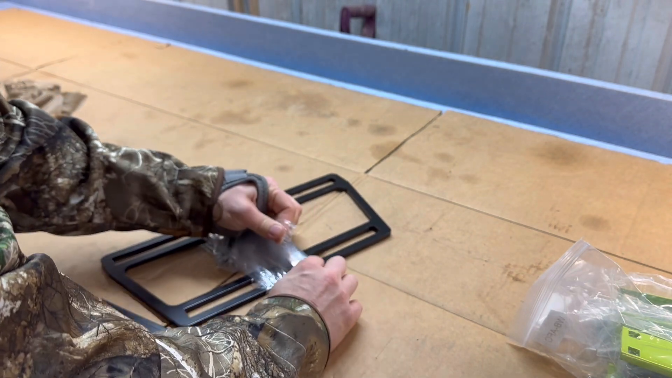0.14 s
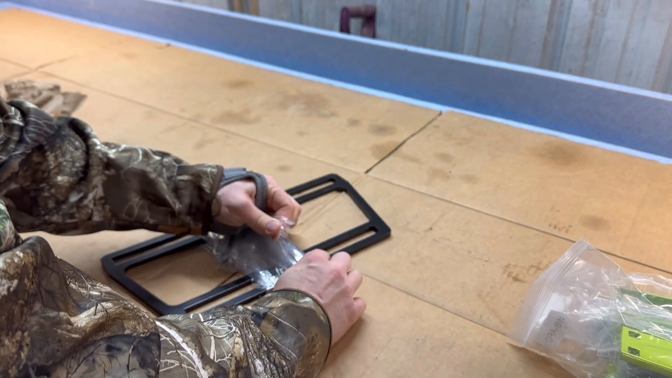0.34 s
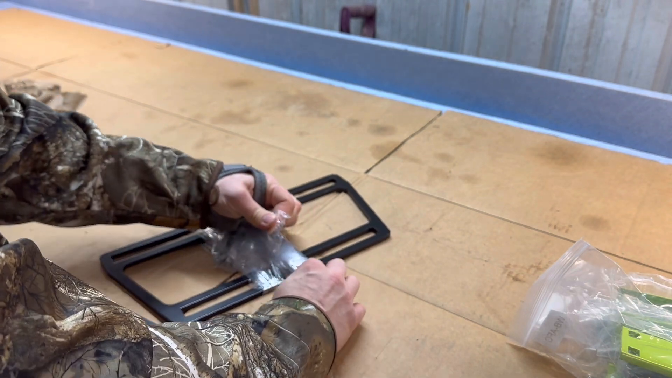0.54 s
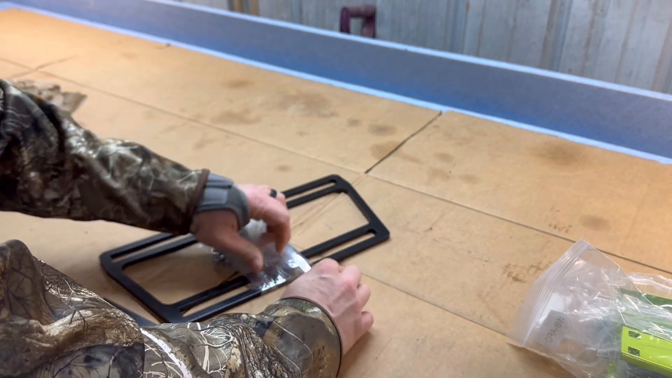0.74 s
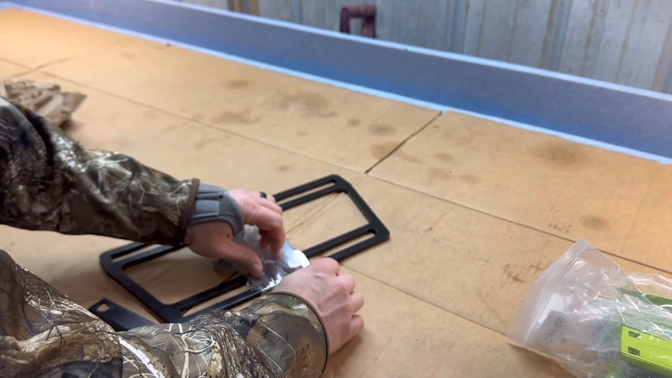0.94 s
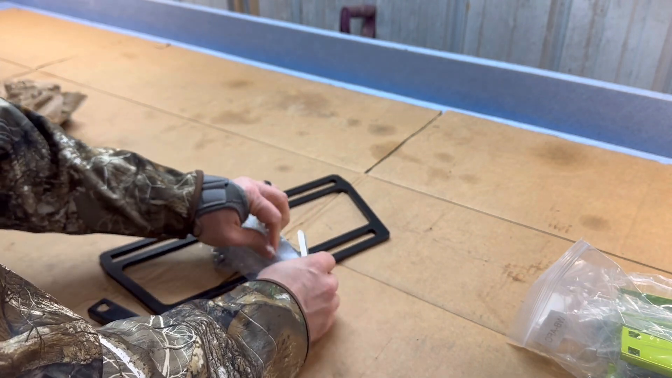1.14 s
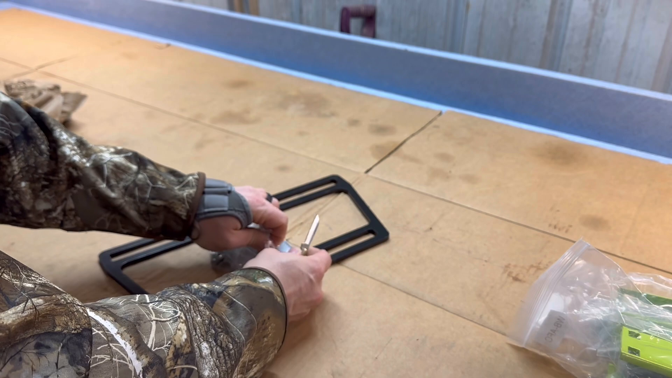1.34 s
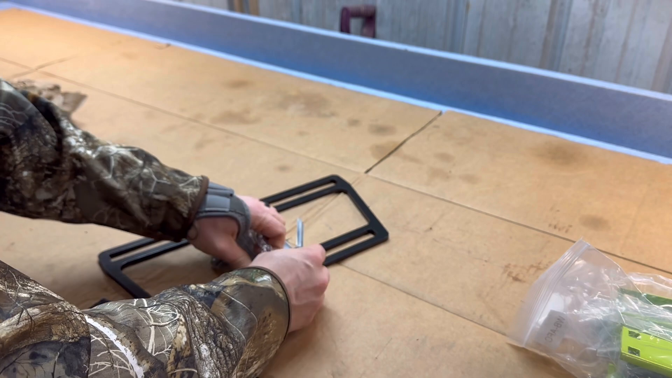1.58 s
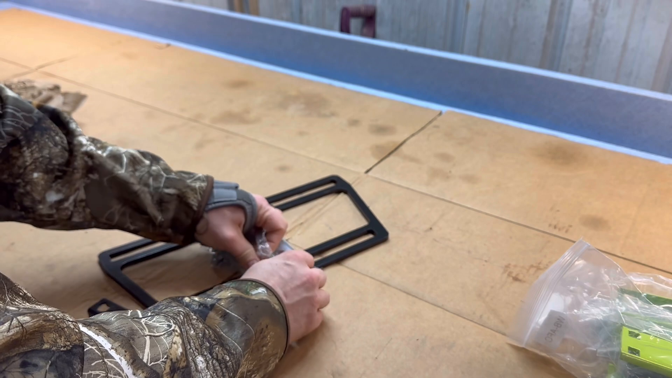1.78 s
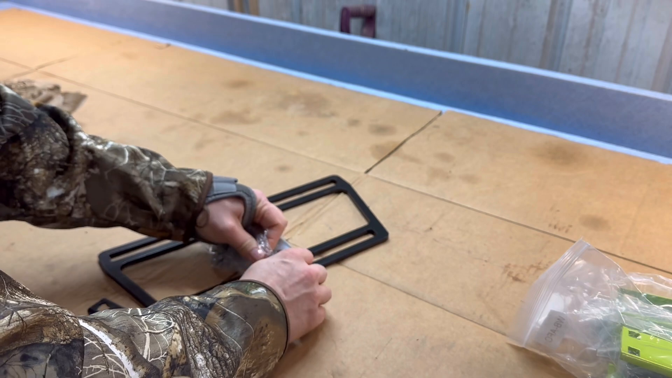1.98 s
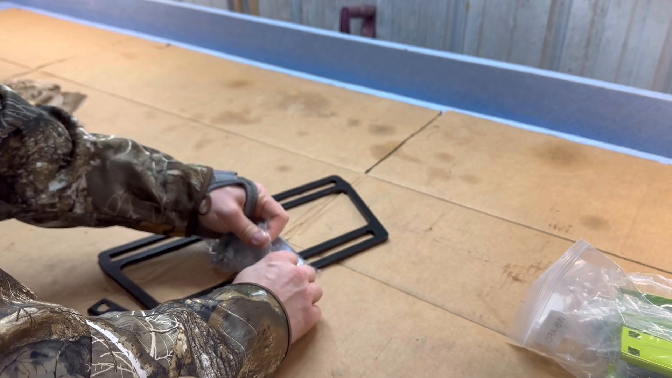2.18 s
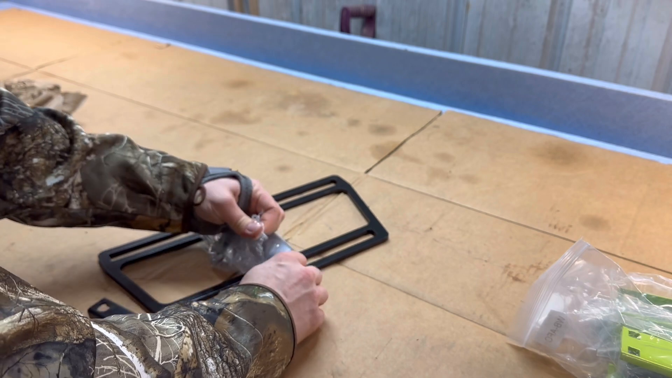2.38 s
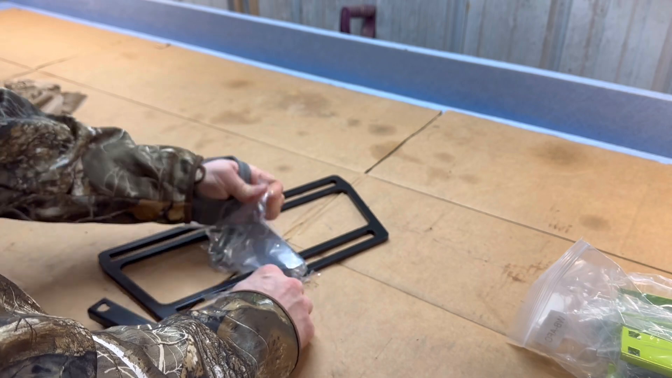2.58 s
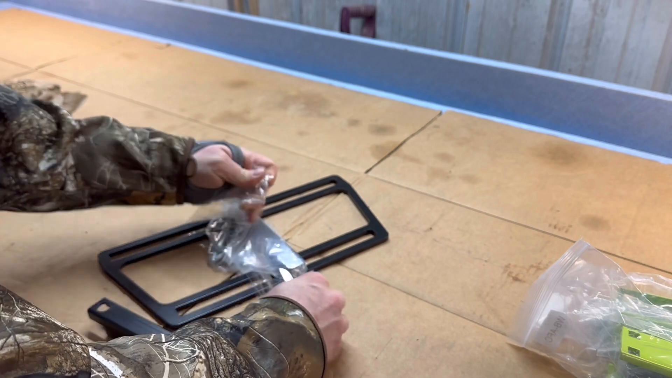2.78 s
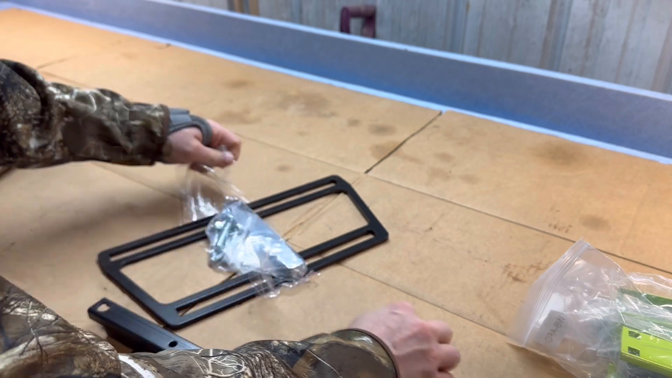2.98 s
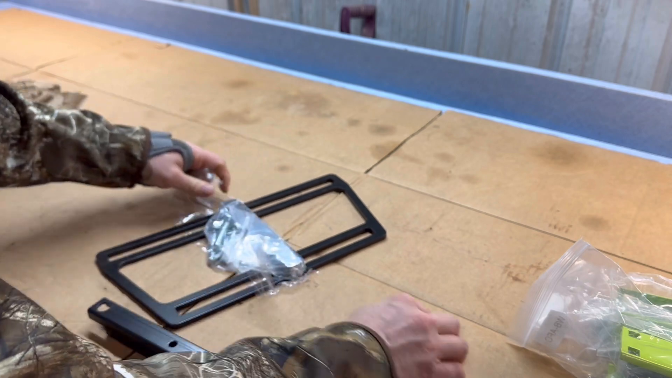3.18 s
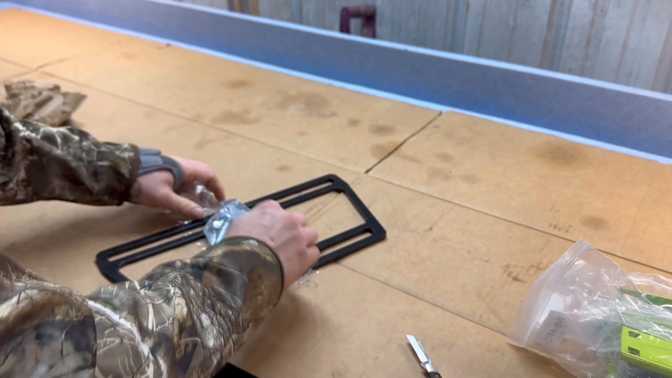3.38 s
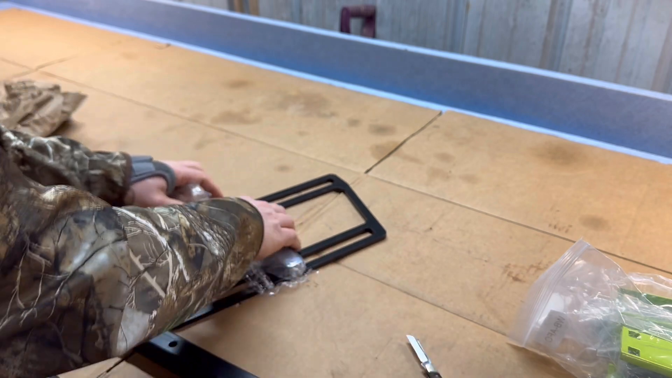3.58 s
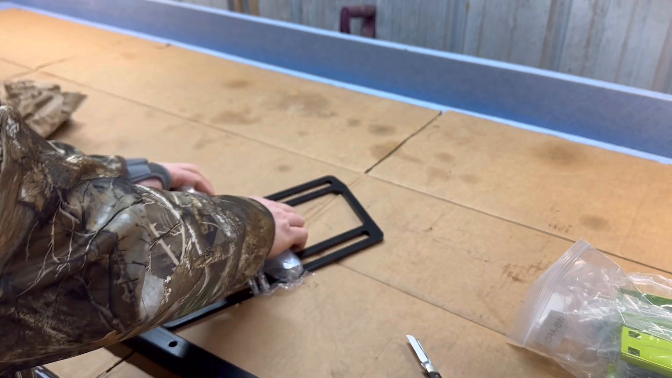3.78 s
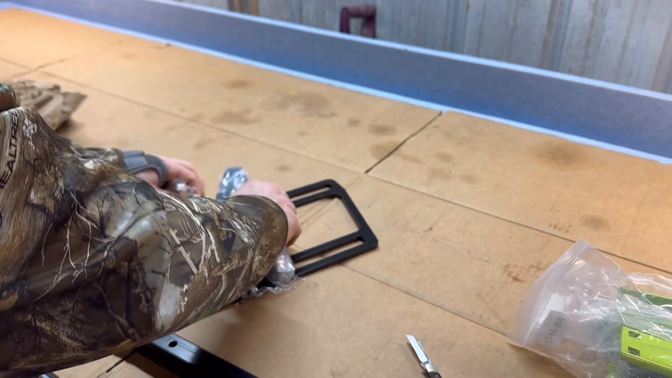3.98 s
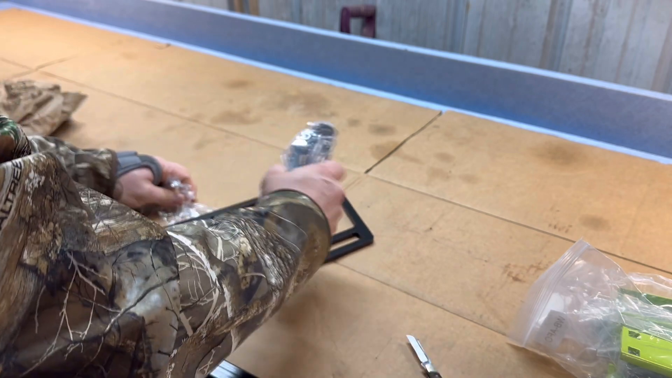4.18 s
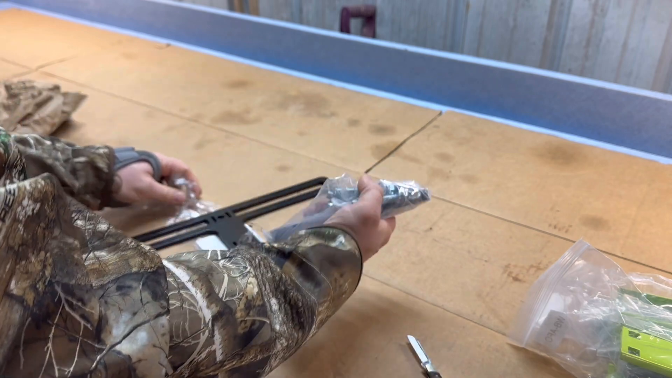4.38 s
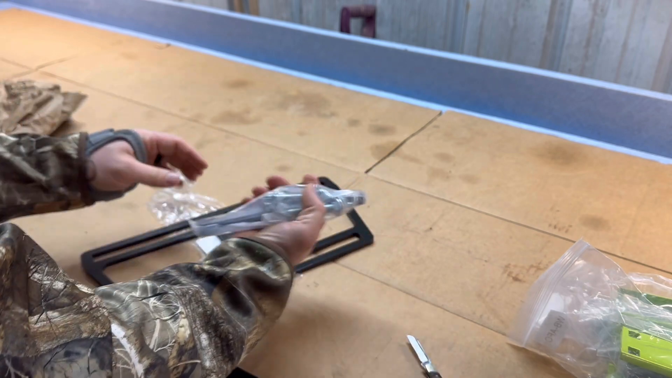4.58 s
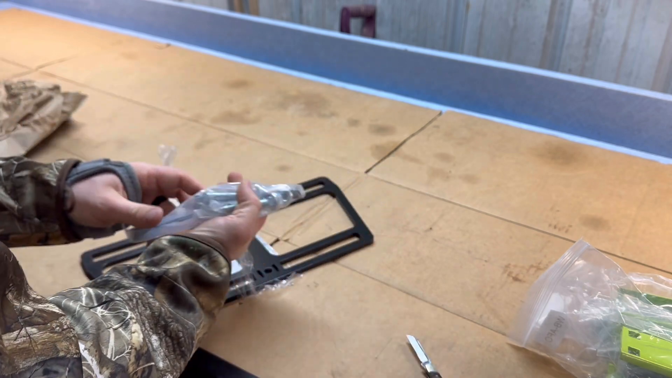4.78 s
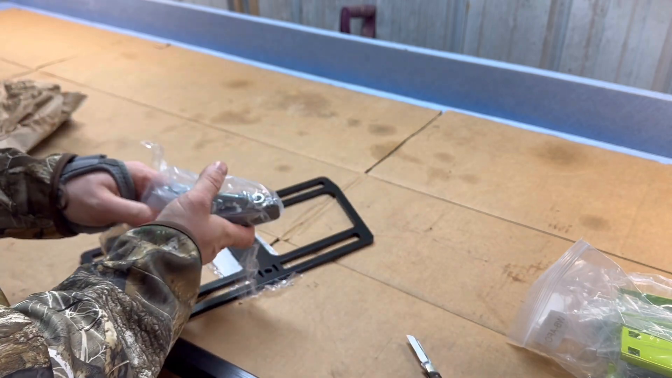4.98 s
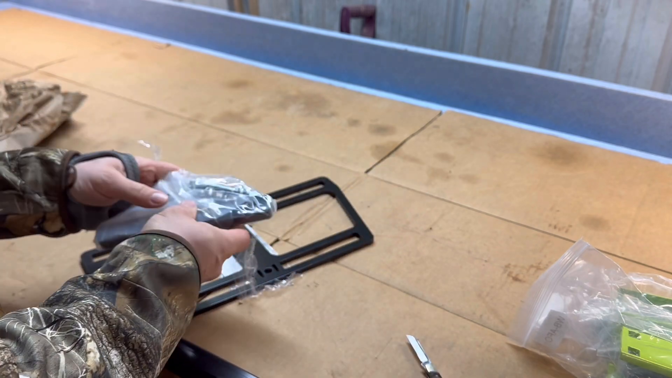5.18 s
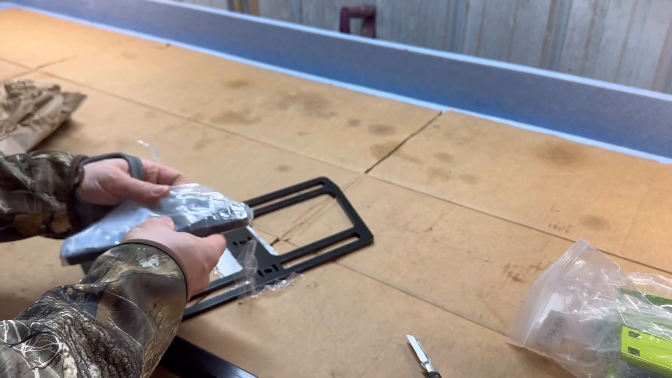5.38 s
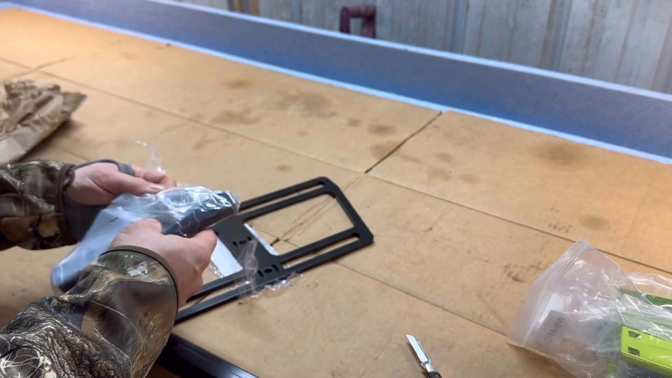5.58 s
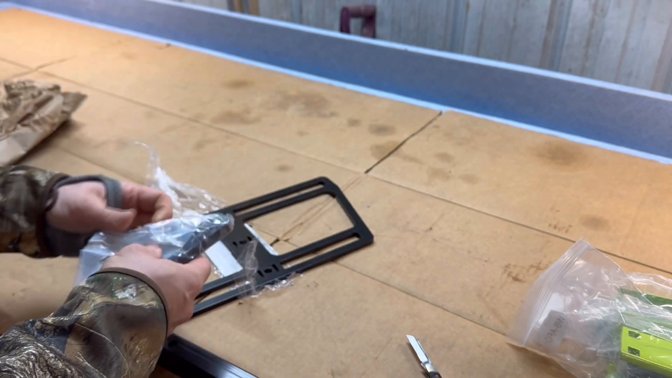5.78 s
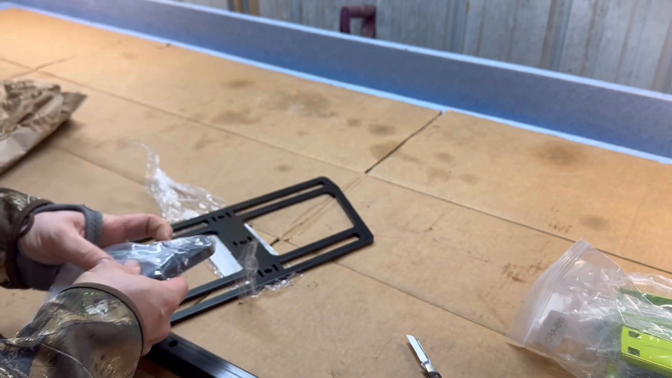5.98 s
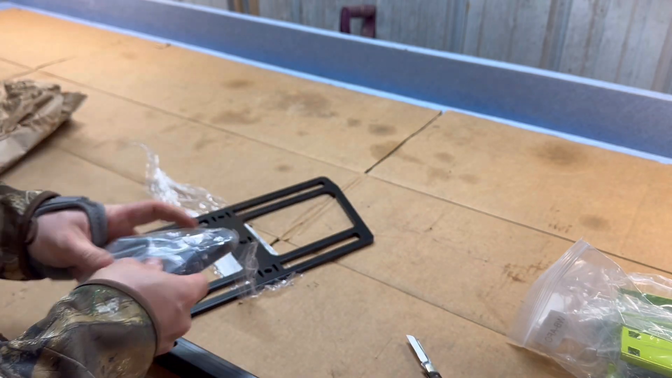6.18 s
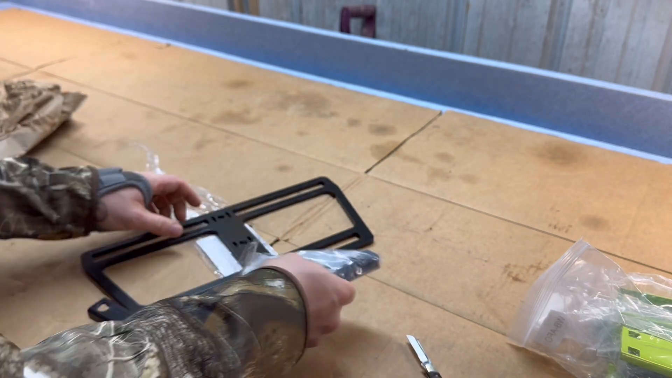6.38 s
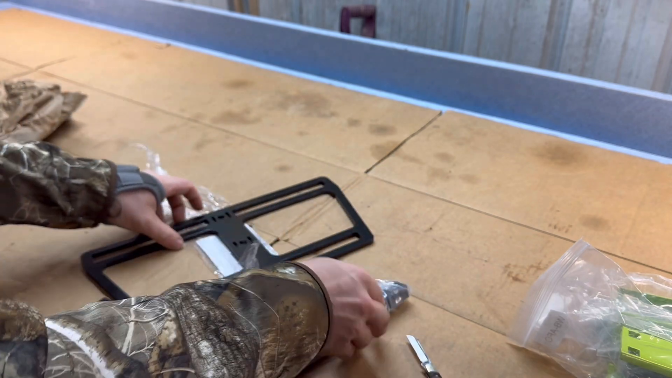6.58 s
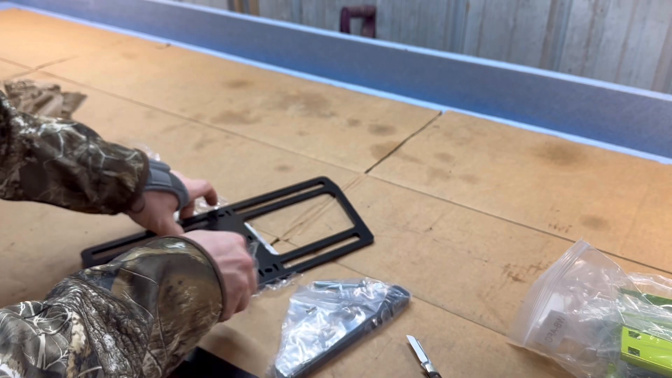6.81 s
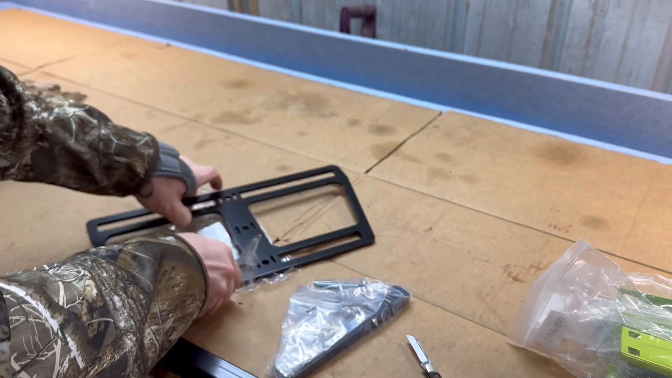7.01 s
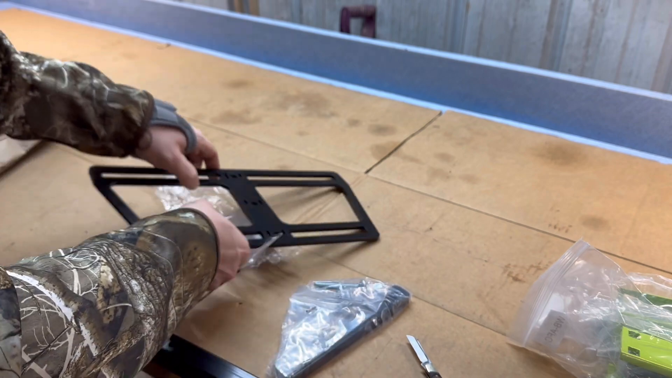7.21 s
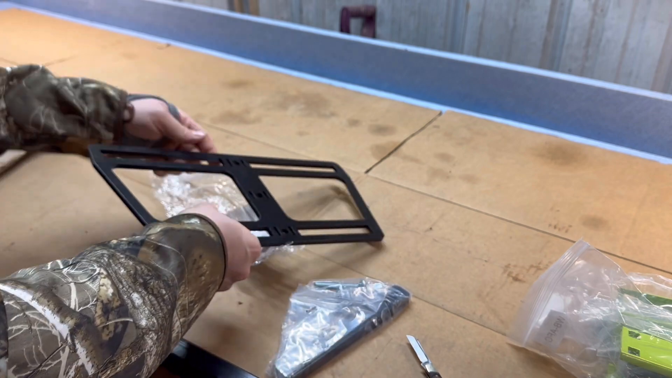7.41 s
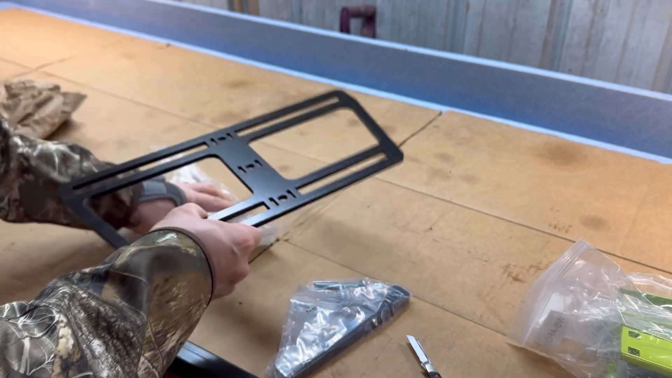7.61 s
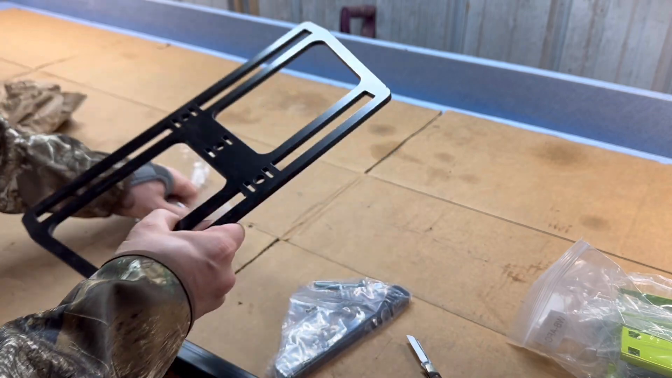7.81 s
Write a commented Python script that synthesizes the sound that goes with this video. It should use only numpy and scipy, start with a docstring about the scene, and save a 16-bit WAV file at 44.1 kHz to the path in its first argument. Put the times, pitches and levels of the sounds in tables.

```python
"""Hands in a stiff jacket tear a plastic wrapper off a metal bracket, then handle a small bag of hardware.
From the start film facets snap, squeezed film crinkles and rubs (impulse grains), and sleeves swish (noise).
Slack panels flip with low chirps; hand and bag knock on a wooden bench (chirp, thud and modes).
Later, metal parts clink in the bag as damped steel modes.
A small two-port microphone stands close by in a workshop with a short echo and quiet air."""
import sys
import numpy as np
from scipy import signal
from scipy.fft import rfft, irfft, next_fast_len
from scipy.io import wavfile
from scipy.ndimage import uniform_filter1d, map_coordinates

SR = 44100
rng = np.random.default_rng(int(sys.argv[2]) if len(sys.argv) > 2 else 0)


def master(y):
    """Save y as 16-bit WAV."""
    cut = np.clip(np.atleast_2d(y).T, -1, 1)
    pcm = np.round(cut * 32767)  # scale
    wavfile.write(sys.argv[1], SR, pcm.astype(np.int16))


N = 346172


def amp(db):
    """Decibels to gain."""
    return 10 ** (np.asarray(db) / 20)


def unit(x):
    """Scale to rms 1."""
    return x / np.sqrt(np.mean(x ** 2) + 1e-20)


def along(points, hz):
    """Read (Hz, value) points on a log frequency axis."""
    point_hz, value = np.transpose(points)
    return np.interp(np.log(hz + 1), np.log(point_hz + 1), value)


def filtered(x, response):
    """Apply a complex response of frequency to x."""
    size = x.shape[-1]
    padded = next_fast_len(size + 2048)
    spectrum = rfft(x, padded) * response(np.fft.rfftfreq(padded, 1 / SR))
    return irfft(spectrum, padded)[..., :size]


def add(track, start_s, sound):
    """Mix a sound into a track in place."""
    part = track[..., max(round(start_s * SR), 0):][..., :sound.shape[-1]]
    part += sound[..., :part.shape[-1]]


def wobble(knots_per_s):
    """A smooth random curve through evenly spaced knots."""
    knots = rng.standard_normal(int(N * knots_per_s / SR) + 4)
    return map_coordinates(knots, [np.arange(N) * knots_per_s / SR], order=2)


def hump(hz, centre_hz, octaves):
    """A broad resonance, bell-shaped on a log frequency axis."""
    return np.exp(-.5 * (np.log2((hz + 1) / centre_hz) / octaves) ** 2)


def bending(hz, delay_1khz_s):
    """Bending waves in a sheet or board: treble travels faster and arrives first."""
    return np.exp(-4j * np.pi * delay_1khz_s * np.sqrt(1000 * hz))


def diffuse(pair):
    """Two unrelated signals become left and right of a spread-out sound."""
    # left-right correlation: hz, correlation
    likeness = [(80, 0.95), (200, 0.87), (500, 0.73), (1200, 0.43), (2800, 0.36), (4200, 0.033),
                (7000, 0.04), (8500, 0.81), (11200, 1), (13000, 1), (14500, 0.88), (16000, 0.35)]

    def mid_side(hz):
        turn = np.arccos(np.clip(along(likeness, hz), -1, 1)) / 2
        return np.array([np.cos(turn), np.sin(turn)])

    mid, side = filtered(pair, mid_side)
    return np.array([mid + side, mid - side])


def coloured(pair, spectrum):
    """Stereo sound of rms 1 with the given (Hz, dB) spectrum."""
    return unit(diffuse(filtered(pair, lambda hz: amp(along(spectrum, hz)))))


def grains(rate_hz, spread_db):
    """Two trains of random impulses of very unequal size, steadied in power over 50 ms."""
    size = amp(spread_db * np.minimum(rng.exponential(size=(2, N)), 4))
    train = (rng.random((2, N)) < rate_hz / SR) * size * rng.choice([-1, 1], (2, N))
    power = np.abs(uniform_filter1d(train ** 2, SR // 20))
    return train / np.sqrt(power + 1e-4)


def ripple(hz, depth_db, spacing_hz):
    """Random resonances of a crumpled sheet, as gain over frequency."""
    knots = rng.standard_normal(512)
    return amp(depth_db * map_coordinates(knots, [hz / spacing_hz], order=2, mode="mirror"))


def snaps(facet_octaves=0.74, crease_octaves=0.53, flutter_db=-4, flutter_t60_s=0.074, pan_db=1,
          crack=0.13, grain_db=-3.0, baffle_hz=400):
    """A facet of film pops through, its crease ticks, and the sheet crackles in its shape of the moment."""
    # film buckles: start_s, facet_pitch_hz, facet_level_db, crease_level_db
    buckles = [(.003, 1300, -46, -49), (.0195, 780, -37, -39), (.0595, 2530, -45, -52),
               (.0677, 1220, -45, -58), (.1109, 2360, -41.5, -31.5), (.142, 1010, -43.5, -56),
               (.3404, 1680, -53.5, -44.5), (.3891, 1170, -45, -42), (.4923, 1360, -44.5, -45),
               (.6277, 2120, -46, -39), (1.4912, 1560, -46.5, -52.5), (1.6329, 1820, -45.5, -50),
               (1.8718, 1220, -51.5, -47), (1.9727, 1640, -49.5, -47.5), (1.9993, 1700, -48, -52.5),
               (2.0593, 1860, -45.5, -52), (2.0774, 1760, -50, -55), (2.1447, 2100, -33.5, -37),
               (2.1526, 2100, -30.5, -27.5), (2.1718, 2560, -32.5, -45), (2.1883, 2780, -44, -48),
               (2.2186, 2320, -35, -40.5), (2.2231, 1890, -27, -38), (2.3678, 1910, -61, -48.5),
               (2.4841, 1150, -35.5, -34), (2.507, 2350, -28.5, -29), (2.5291, 960, -37, -43),
               (2.936, 614, -43, -48), (2.9511, 900, -45.5, -39), (3.0861, 864, -44.5, -53),
               (3.6026, 1860, -57, -54.5), (3.6512, 1490, -48.5, -62), (3.888, 1680, -41, -40.5),
               (3.9016, 1320, -33, -54), (3.907, 1190, -29.5, -53), (3.9254, 1170, -33.5, -42),
               (3.9947, 1340, -42, -62), (4.055, 1240, -43, -57), (4.098, 4500, -52, -34.5),
               (4.1094, 1220, -43, -51), (4.2061, 2000, -36.5, -52), (4.319, 1190, -50, -65),
               (4.4926, 1400, -44.5, -73), (4.5359, 1440, -46, -55), (4.6738, 1610, -38, -38.5),
               (4.7847, 1920, -47, -44), (4.8984, 1420, -43.5, -54), (4.9311, 1120, -41.5, -38.5),
               (4.9898, 1660, -45.5, -54), (5.0853, 1940, -45, -68), (5.1466, 1430, -38, -49),
               (5.1682, 1070, -40.5, -49), (5.1759, 1480, -41, -43.5), (5.2138, 1310, -36.5, -43),
               (5.222, 890, -41, -52), (5.2764, 1500, -44.5, -42), (5.331, 1040, -41.5, -49),
               (5.3511, 1650, -36, -54), (5.3682, 3020, -39.5, -59), (5.438, 1040, -50.5, -45),
               (5.5143, 1430, -43, -34.5), (5.5317, 1400, -43, -39.5), (5.5357, 1470, -38, -36),
               (5.5447, 1250, -38, -49), (5.5564, 825, -38, -57), (5.5788, 900, -37, -46),
               (5.5999, 1710, -34, -28), (5.6278, 850, -39.5, -41), (5.749, 1220, -45, -42),
               (5.7842, 1740, -47, -38), (5.794, 3200, -48, -31), (5.8074, 1020, -38, -30),
               (5.814, 1140, -37, -43), (5.8893, 1180, -50, -54), (5.9129, 1300, -45, -44),
               (5.9311, 860, -35.5, -41), (5.9582, 930, -36, -32.5), (5.9765, 2000, -49, -44),
               (5.9891, 1280, -33.5, -47), (6.0327, 1390, -43, -37.5), (6.0425, 920, -32.5, -39),
               (6.0773, 1140, -46, -40.5), (6.1062, 1210, -42.5, -50), (6.1506, 1290, -40, -36.5),
               (6.1839, 3020, -34.5, -44), (6.1885, 1030, -39.5, -37.5), (6.2758, 1310, -44.5, -68),
               (6.4281, 1000, -43, -55), (6.439, 1020, -43, -69), (6.4806, 1110, -38, -64),
               (6.4989, 1000, -27.5, -56), (6.489, 1300, -31, -58), (6.51, 1780, -36, -58),
               (6.5345, 1480, -28, -55), (6.5483, 930, -32.5, -52), (6.6044, 438, -26, -54),
               (6.6279, 830, -33, -50), (6.8007, 780, -47, -52.5), (7.486, 1140, -56, -75),
               (7.515, 930, -46, -49.5)]
    # creases tick higher in the thin wrapper than in the thicker bag
    wrapper_crease_hz, bag_crease_hz, bag_from_s = 8000, 5560, 4.75
    usual_facet_hz = 1500
    crease_follows = 0.25  # crease octaves per facet octave
    crack_grows = 0.53  # dB of top treble per dB by which the crease outdoes its facet
    out, t = np.zeros((2, N)), np.arange(2048) / SR
    level_span = np.sqrt(.005 * SR)  # levels refer to rms over 5 ms
    lead = 64  # samples
    for start_s, facet_hz, facet_db, crease_db in buckles:
        film_hz = wrapper_crease_hz if start_s < bag_from_s else bag_crease_hz
        crease_hz = film_hz * (facet_hz / usual_facet_hz) ** crease_follows
        travel_s, pan = rng.uniform(0.000557, 0.001406), rng.normal() * pan_db
        # each facet lies in its own direction
        lag_s = rng.normal() * 1.5e-5 * np.array([[1], [-1]])
        noise = rng.standard_normal((2, len(t)))
        modes = filtered(noise, lambda hz: ripple(hz, depth_db=5, spacing_hz=170))
        # neighbouring facets follow in uneven clumps
        clumps = map_coordinates(rng.standard_normal(48), [t * 700], order=1)
        flutter = diffuse(modes * amp(grain_db * clumps - 60 * t / flutter_t60_s))
        # the crease gives way in two steps, under a millisecond apart
        second = rng.uniform(-.8, .8) * (np.arange(len(t)) == rng.integers(12, 44))
        steps = (t == 0) + second
        drive = amp(flutter_db) * flutter / np.linalg.norm(flutter[0]) + steps / np.linalg.norm(steps)
        # a crease that gives way with little facet behind it throws more top treble
        sharpness = crack * amp(crack_grows * (crease_db - facet_db))

        def response(hz):
            # a small sheet radiates little bass
            radiation = hz ** 2 / np.hypot(hz ** 2, baffle_hz ** 2)
            body = unit(hump(hz, facet_hz, facet_octaves) * radiation)
            tick = unit(hump(hz, crease_hz, crease_octaves) + sharpness * hump(hz, 15000, .3))
            path = bending(hz, travel_s) * np.exp(-1j * np.pi * hz * lag_s)
            return (amp(facet_db) * body + amp(crease_db) * tick) * path

        pop = filtered(np.pad(drive, ((0, 0), (lead, 0))), response)
        add(out, start_s - lead / SR, level_span * pop * amp([[pan], [-pan]]))
    return out


def patchy(x, depth_db):
    """Random gain patches, about 260 Hz by 50 ms, make the noise uneven in pitch and time."""
    z = signal.stft(x, nperseg=512)[2]
    field = uniform_filter1d(rng.standard_normal(z.shape[1:]), size=3, axis=0)
    field = uniform_filter1d(field, size=9, axis=1)
    return signal.istft(z * amp(depth_db * unit(field)), nperseg=512)[1][:, :N]


def crinkle():
    """Countless small facets of different sizes pop over a faint blur of sliding film."""
    # crinkle spectrum: hz, relative_db
    crinkle_spectrum = [(200, -51), (550, -25), (900, 2), (1600, 2.5), (2200, -1.5), (2800, 1), (3500, -4),
                        (5000, -8.5), (7500, -7), (10000, -13), (16000, -47)]
    pops = np.zeros((2, N))
    for centre_hz in np.geomspace(700, 9000, 5):
        train = grains(rate_hz=80, spread_db=4)
        pops += filtered(train, lambda hz: hump(hz, centre_hz, .5) * bending(hz, .001))
    blur = .3 * rng.standard_normal((2, N))
    return coloured(patchy(pops + blur, depth_db=3), crinkle_spectrum)


def strokes(rows, rest_db):
    """Gain over time of movements that swell to a peak and die away, over a resting level."""
    range_db = 20  # a stroke rises and falls by this much over its two times
    rounding = 1.146  # above 1 a stroke has a rounder top and stops sooner
    t, power = np.arange(N) / SR, amp(2 * rest_db)
    for peak_s, rise_s, fall_s, level_db in rows:
        away = np.maximum((peak_s - t) / rise_s, (t - peak_s) / fall_s)
        power = power + amp(level_db - range_db * away ** rounding) ** 2
    return np.sqrt(power)


def handling(rub_db=-1, crinkle_db=-4.0, swish_db=1, slip_db=-17):
    """Hands rub and crush the wrapper while sleeves and film slide with a fine hiss."""
    # fingers close on the film: tightest_s, build_up_s, release_s, crinkle_level_db, rub_level_db
    squeezes = np.array([(.01, 0.01, 0.075, -36.5, -54), (0.119, 0.059, 0.4, -46, -56),
                         (.495, 0.073, 0.13, -46.5, -57), (.76, 0.13, 0.13, -57.5, -66.5),
                         (1.14, .15, .15, -70, -70), (1.32, 0.09, 0.041, -50.5, -64),
                         (1.62, 0.084, 0.11, -47, -64), (1.868, 0.44, 0.093, -54, -81),
                         (2.15, 0.0079, 0.088, -32, -52.5), (2.5, 0.06, 0.13, -36, -46),
                         (2.935, 0.23, 0.056, -47.5, -44.5), (3.07, 0.16, 0.18, -50, -59),
                         (3.34, 0.091, 0.11, -56, -59.5), (3.786, 0.18, 0.18, -38.5, -55),
                         (3.655, .03, 0.043, -46, -70), (3.907, 0.027, 0.17, -34, -42),
                         (4.11, 0.074, 0.23, -49.5, -54), (4.39, 0.19, 0.12, -46, -54),
                         (4.53, 0.039, 0.055, -44, -53.5), (4.782, 0.031, 0.06, -47, -62.5),
                         (4.95, 0.11, 0.39, -49, -61.5), (5.165, 0.068, 0.21, -44, -50),
                         (5.34, 0.19, 0.1, -47, -53), (5.47, 0.11, 0.092, -45.5, -52),
                         (5.548, 0.041, 0.094, -41, -51), (5.614, 0.037, 0.056, -36.5, -39),
                         (5.68, .06, 0.2, -45, -53.5), (5.806, 0.078, 0.11, -35, -43),
                         (5.934, 0.04, 0.19, -36.5, -42), (6.044, .03, 0.083, -35, -56),
                         (6.19, 0.1, 0.12, -38.5, -45.5), (6.49, 0.015, 0.18, -32, -38.5),
                         (6.605, 0.061, 0.074, -28.5, -37), (7, 0.088, 0.24, -64, -67),
                         (7.227, 0.15, 0.059, -55.5, -62), (7.52, 0.05, 0.082, -56, -54.5),
                         (7.63, 0.077, 0.06, -48, -61), (7.8, 0.37, 0.31, -41.5, -69)])
    # sleeves and film slide as the arms move: fastest_s, speed_up_s, slow_down_s, swish_level_db
    slides = [(.005, 0.0077, 0.062, -43), (.125, 0.05, 0.17, -40), (.42, 0.15, 1, -50.5),
              (.63, 0.06, 0.029, -48), (.735, 0.02, .18, -52.5), (.87, 0.025, .1, -66),
              (.96, 0.06, .15, -58.5), (1.155, 0.22, 0.1, -44.5), (1.32, 0.1, 0.11, -49.5),
              (1.58, 0.1, 0.13, -42.5), (1.8, 0.31, 0.29, -53.5), (2.09, 0.062, .2, -53),
              (2.165, 0.029, 0.12, -37.5), (2.38, 0.17, 0.067, -57), (2.522, 0.1, 0.15, -39.5),
              (2.935, 0.33, 0.21, -42.5), (3.14, 0.16, 0.19, -51), (3.26, 0.031, .08, -57),
              (3.335, 0.064, 0.068, -54.5), (3.54, 0.18, .15, -56.5), (3.79, 0.14, 0.25, -43),
              (3.92, .04, 0.39, -46.5), (4.385, 0.15, 0.053, -47), (4.68, 0.019, 0.34, -53),
              (5.21, 0.17, .05, -47.5), (5.97, 0.023, 0.047, -39.5), (6.196, 0.038, 0.046, -42),
              (6.58, 0.17, 0.14, -42), (6.92, 0.1, 0.17, -50.5), (7.03, .15, 0.19, -50),
              (7.227, 0.085, 0.097, -50.5), (7.63, 0.045, 0.51, -45), (7.84, 0.37, 0.22, -40)]
    # rubbing spectrum: hz, relative_db_per_hz
    rub_spectrum = [(40, -19), (150, -23.5), (280, -6), (480, 3), (720, 3), (1000, 1.5), (1600, -16),
                    (4000, -65)]
    # swish spectrum: hz, relative_db
    swish_spectrum = [(400, -11), (1500, -1), (2700, 4), (3500, 2.5), (5000, 2), (7000, 5), (8500, 4.5),
                      (9500, -0.5), (10700, 3.5), (13000, -3), (14500, 3.5), (16000, -2)]
    # the held film is never quite still
    rest_crinkle_db, rest_rub_db, rest_swish_db = -72.5, -77.5, -70.5
    crush = strokes(squeezes[:, :4], rest_crinkle_db)
    rub = strokes(squeezes[:, [0, 1, 2, 4]], rest_rub_db)
    # squeezed film also slips a little over itself
    slide = np.hypot(strokes(slides, rest_swish_db), amp(slip_db) * crush)
    rubbing = rub * amp(rub_db) * coloured(grains(rate_hz=500, spread_db=3), rub_spectrum)
    weave = grains(rate_hz=3500, spread_db=8.0) + 1.73 * rng.standard_normal((2, N))
    weave = patchy(weave, depth_db=2.2)
    swish = slide * amp(swish_db + 2.14 * wobble(70)) * coloured(weave, swish_spectrum)
    return rubbing + crush * amp(crinkle_db) * crinkle() + swish


def flips(octaves=0.56, travel_s=0.001987, flap_db=-6, flap_t60_s=0.045):
    """A large slack panel turns inside out: a low falling chirp and a short flap."""
    # hollow pops of slack film: start_s, level_db, pitch_hz
    panels = [(.021, -43.5, 544), (.142, -52, 544), (.261, -47.5, 506), (0.39, -47, 890),
              (1.491, -53.5, 580), (1.873, -53, 684), (2.507, -42, 540), (3.908, -41, 440),
              (4.11, -54, 700), (4.145, -51, 600), (4.417, -44.5, 410), (4.49, -49, 704), (4.523, -48, 450),
              (4.557, -53, 930), (5.163, -47.5, 440), (6.228, -46, 534), (6.498, -39.5, 477),
              (6.608, -45, 427)]
    out, t = np.zeros(N), np.arange(SR // 10) / SR
    lead = SR // 200  # samples
    for start_s, level_db, pitch_hz in panels:
        flap = rng.standard_normal(len(t)) * amp(-60 * t / flap_t60_s)
        drive = np.pad((t == 0) + amp(flap_db) * flap / np.linalg.norm(flap), (lead, 0))
        pop = filtered(drive, lambda hz: hump(hz, pitch_hz, octaves) * bending(hz, travel_s))
        level = amp(level_db) * np.sqrt(SR / 100)  # rms over 10 ms
        add(out, start_s - lead / SR, level * pop / np.linalg.norm(pop))
    return out


def bench(thud_db=-1, thud_t60_s=0.2, t60_100hz_s=0.54, travel_s=0.00304,
          push_db=3, push_width_s=0.0209, boom_hz=300):
    """A blow runs through the wide top as a falling chirp, then rings it; soft pushes only flex it."""
    # blows on the bench: start_s, level_db, hardness_hz
    knocks = [(.14, -60.5, 220), (2.529, -58, 353), (2.799, -58, 200), (2.876, -53, 300), (2.923, -41, 303),
              (3.085, -47.5, 404), (3.124, -40, 418), (3.908, -53, 900), (6.496, -39.5, 505),
              (6.604, -33, 575), (6.627, -34.5, 197), (6.655, -43, 245), (6.8, -50, 473), (7.169, -53, 318),
              (7.22, -62, 282), (7.516, -55.5, 503)]
    # soft pushes of the arms: centre_s, level_db, pitch_hz
    pushes = [(1.55, -66, 64), (2.215, -53.5, 59), (2.38, -81, 63.3), (2.569, -57, 65.6), (2.63, -61, 60.6),
              (4.19, -55.5, 68), (7.273, -55, 60.6)]
    # modes of the bench top: hz, relative_db
    top_modes = [(49, -5), (77, -3.5), (115, -2), (130, 2.5), (200, 5), (240, 2), (300, 2), (371, 9.5),
                 (431, 1), (524, 11), (732, 13), (997, -7), (1217, 1), (1501, -1)]
    out, t = np.zeros((2, N)), np.arange(SR) / SR
    heavy = signal.butter(2, boom_hz, fs=SR, output="sos")
    for start_s, level_db, hardness_hz in knocks:
        contact = signal.butter(3, hardness_hz, fs=SR, output="sos")
        ring = np.zeros(len(t))
        for hz, mode_db in top_modes:
            t60_s = t60_100hz_s * (100 / hz) ** (2 / 3)  # higher modes die sooner
            gain = amp(mode_db + 2 * rng.normal() - 60 * t / t60_s) * rng.choice([-1, 1])
            ring += gain * np.sin(2 * np.pi * hz * (1 + 0.006 * rng.normal()) * t)
        chirp = filtered(1. * (t == 0), lambda hz: hz / (hz + 200) * bending(hz, travel_s))
        # the many close modes of the top keep only their bass
        burst = amp(-60 * t / thud_t60_s) * rng.standard_normal((2, len(t)))
        thud = diffuse(signal.sosfilt(heavy, burst))
        blow = sum(amp(part_db) * unit(signal.sosfilt(contact, part))
                   for part_db, part in [(0, chirp), (thud_db, thud), (0, ring)])
        add(out, start_s, amp(level_db) * blow / np.std(blow[:, :SR // 50]))
    for centre_s, level_db, pitch_hz in pushes:
        swell = np.exp(-.5 * (t / push_width_s - 2) ** 2) * (1 - np.exp(-t / push_width_s))
        push = amp(level_db + push_db) * swell * np.sin(2 * np.pi * pitch_hz * t)
        add(out, centre_s - 2 * push_width_s, push)
    return out


def hardware(octaves=0.39, attack_s=0.00053):
    """Small steel parts ring until the bag damps them, each contact favouring other modes."""
    # metal parts meet in the bag: start_s, level_db, most_excited_hz, t60_s
    clinks = [(4.522, -31, 8900, 0.12), (4.561, -48, 6960, 0.28), (4.775, -44, 4350, 0.32),
              (4.781, -36, 6700, 0.099), (4.808, -43, 6050, 0.13), (4.961, -35, 3620, .055),
              (5.126, -32, 6900, .13), (5.195, -34, 11800, 0.17), (5.214, -38, 6960, 0.1),
              (5.459, -50, 7000, 0.47), (5.573, -43.5, 7000, 0.2), (5.649, -40.5, 6500, 0.44),
              (6.043, -42, 12000, 0.075), (6.203, -43, 12500, 0.12), (6.217, -33, 6900, 0.23),
              (6.499, -27, 8750, 0.23), (6.522, -21.5, 8600, 0.1), (6.602, -38, 4940, 0.24),
              (6.655, -48.5, 5750, 0.34)]
    # modes of the steel parts: hz, relative_db
    steel_modes = [(3924, 2.5), (3945, 9), (6312, -27), (6335, -10), (6935, 9), (6975, 5), (7246, -4),
                   (8218, -16), (9044, -22), (12700, 0), (12760, 6.5)]
    out, t = np.zeros((2, N)), np.arange(SR // 3) / SR
    hz, mode_db = np.transpose(steel_modes)[:, :, None]
    for start_s, level_db, centre_hz, t60_s in clinks:
        share = amp(mode_db + 2 * rng.standard_normal(hz.shape)) * hump(hz, centre_hz, octaves)
        phase = rng.uniform(0, 2 * np.pi, hz.shape) + .5 * rng.standard_normal((2, len(hz), 1))
        # the parts keep chattering against each other, which jostles the phase of every mode
        phase = phase + .022 * np.cumsum(rng.standard_normal((len(hz), len(t))), axis=1)
        ring = (share / np.linalg.norm(share) * np.sin(2 * np.pi * hz * t + phase)).sum(1)
        envelope = amp(level_db - 60 * t / t60_s) * (1 - np.exp(-t / attack_s))
        add(out, start_s, envelope * ring)
    return out * amp([[1.5], [-1.5]])


def room(x):
    """The workshop answers 4 ms later; its bass lingers longest."""
    # decay of the workshop: hz, t60_s
    decay = [(100, 1), (400, 0.56), (1500, 0.45), (6000, 0.37), (15000, 0.063)]
    hz, t, z = signal.stft(rng.standard_normal((2, SR)), SR, nperseg=256)
    fading = z * amp(-60 * t / along(decay, hz)[:, None])
    tail = diffuse(signal.istft(fading, SR, nperseg=256)[1])
    tail = np.pad(tail / np.linalg.norm(tail[0]), ((0, 0), (SR // 250, 0)))
    return signal.fftconvolve(x, tail, axes=1)[:, :N]


def scene():
    """Wrapper, hardware and bench in the workshop's quiet air."""
    # where the hands are: time_s, left_minus_right_db
    place = [(0, 0.5), (4.9, 0.5), (5.7, 1.5), (6.2, 1.7), (6.6, -1.5)]
    # spectrum of the air: hz, relative_db
    air_spectrum = [(20, -30), (50, 5.5), (110, 9), (250, 7.5), (600, -6), (1500, 5.5), (5000, -14.5),
                    (16000, -51)]
    balance_db = np.interp(np.arange(N) / SR, *np.transpose(place))
    pan = amp(balance_db * np.array([[.5], [-.5]]))
    sharp = snaps() + hardware() + flips()
    knocks = bench()
    air = amp(-76.5) * coloured(rng.standard_normal((2, N)), air_spectrum)
    echo = room(amp(-15.0) * sharp + amp(-14) * knocks)
    return pan * (sharp + handling()) + knocks + echo + air


def record(dry):
    """A low cut, two ports that hear each frequency at a different phase, and a band limit."""
    # phase between the ports: hz, left_lead_rad
    port_phase = [(20, 0), (1500, .3), (2200, 1), (3300, 2.7), (4500, 4.9), (6300, 6.7), (7500, 9),
                  (8300, 12), (9100, 11.6), (11300, 9.4), (14000, 6.4), (16000, 5.6)]
    low_hz, top_hz = 38, 15900
    cut = signal.sosfilt(signal.butter(6, low_hz, "high", fs=SR, output="sos"), dry)

    def ports(hz):
        return np.exp(.5j * along(port_phase, hz) * np.array([[1], [-1]])) * (hz < top_hz)

    return filtered(cut, ports)


dry = scene()
out = record(dry)
master(out)
```